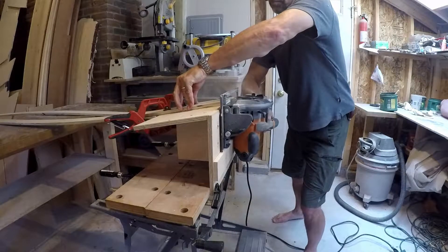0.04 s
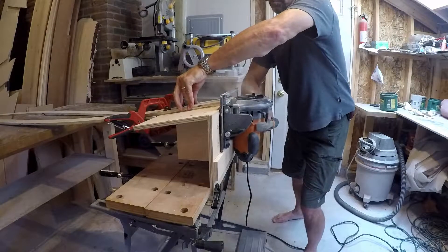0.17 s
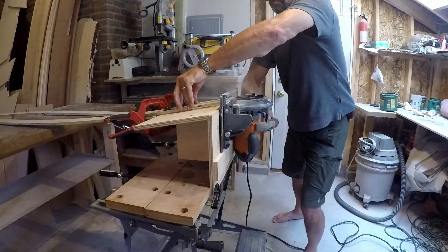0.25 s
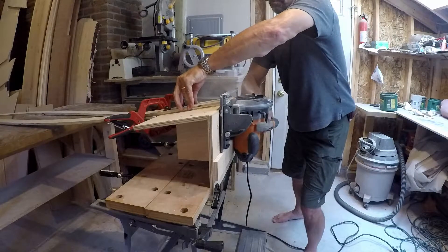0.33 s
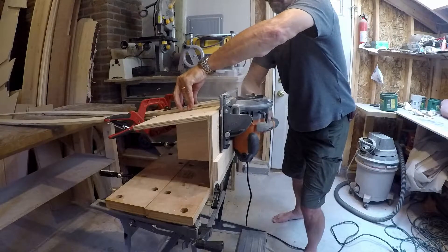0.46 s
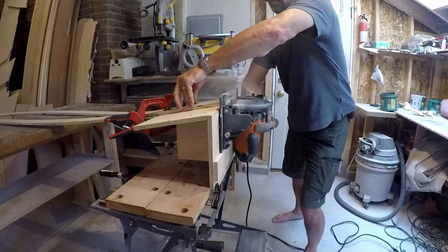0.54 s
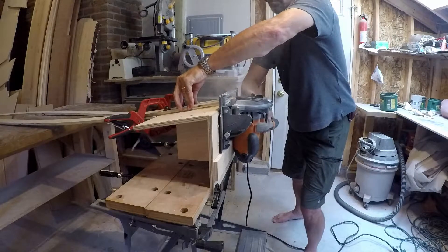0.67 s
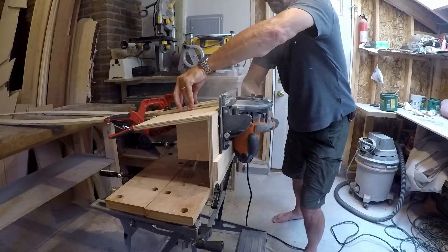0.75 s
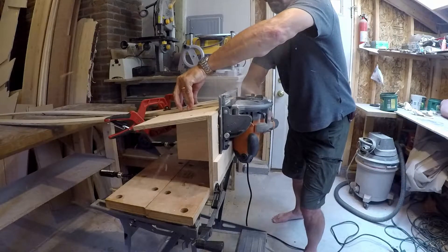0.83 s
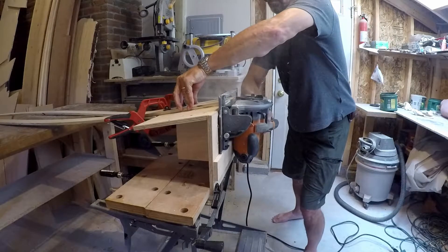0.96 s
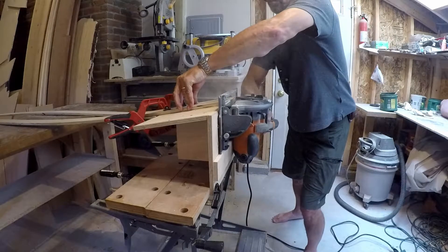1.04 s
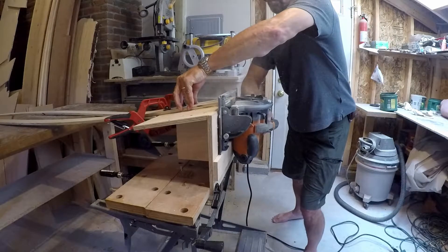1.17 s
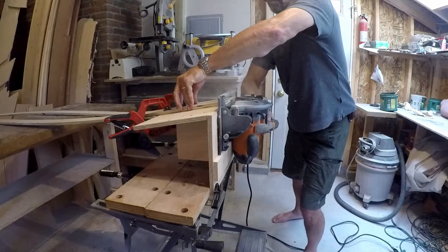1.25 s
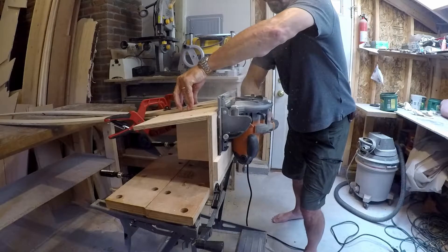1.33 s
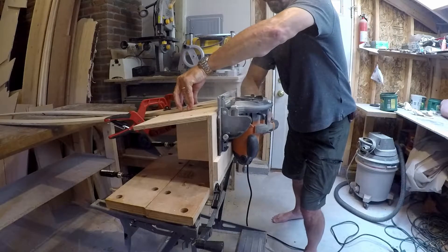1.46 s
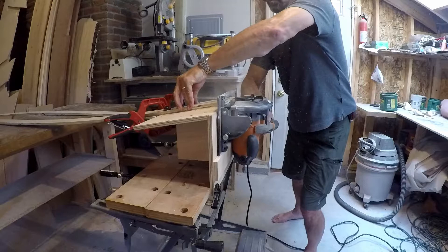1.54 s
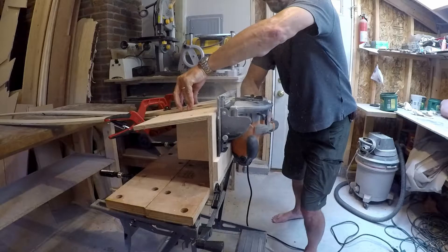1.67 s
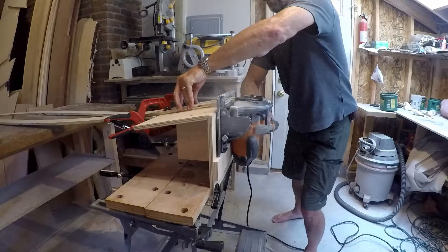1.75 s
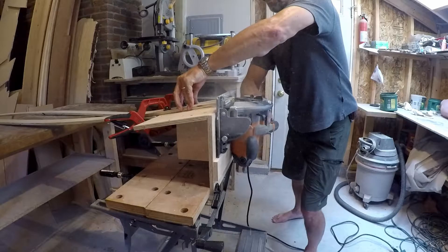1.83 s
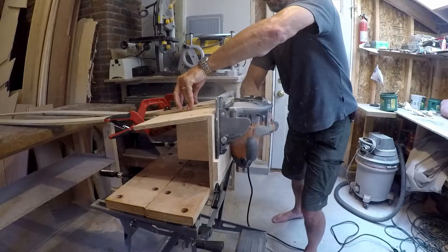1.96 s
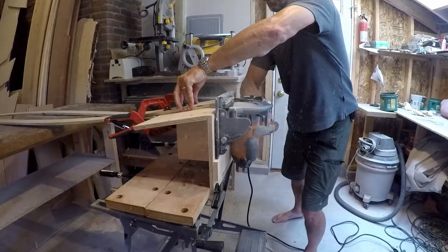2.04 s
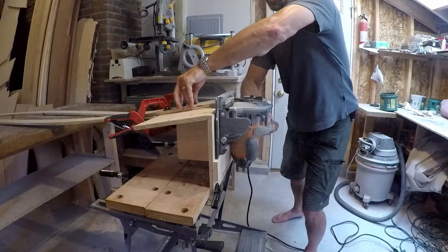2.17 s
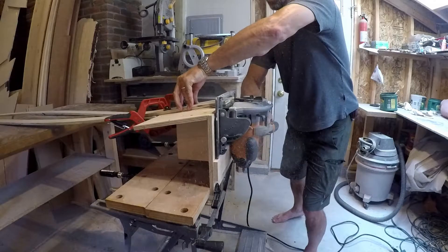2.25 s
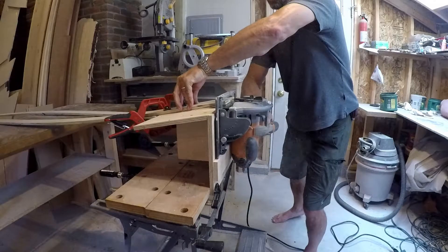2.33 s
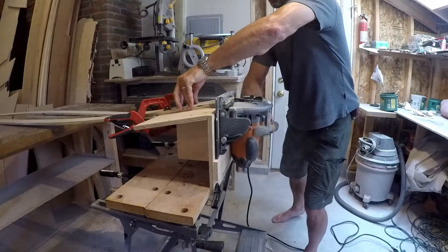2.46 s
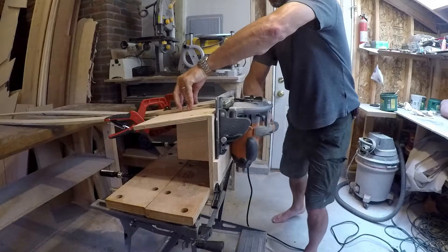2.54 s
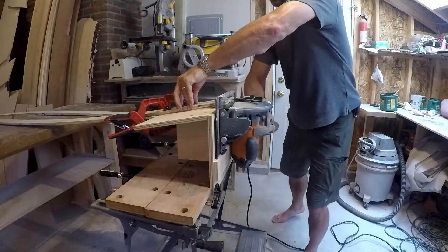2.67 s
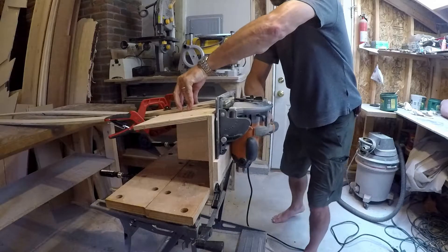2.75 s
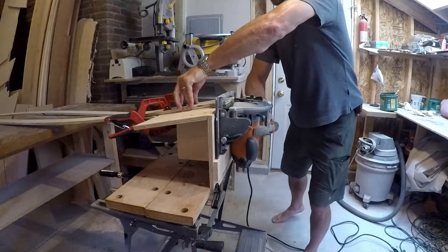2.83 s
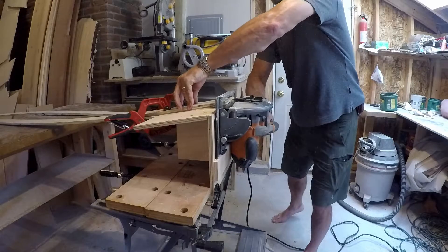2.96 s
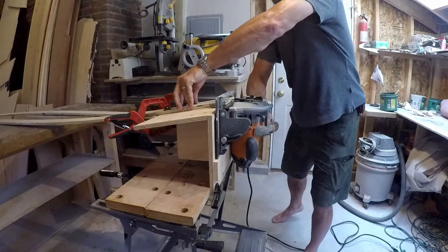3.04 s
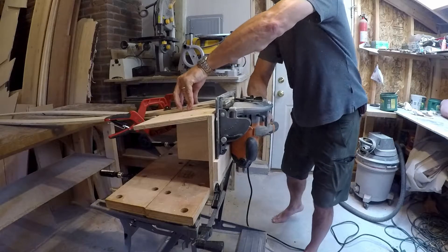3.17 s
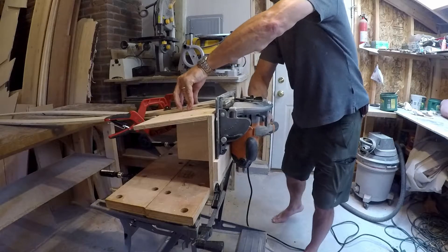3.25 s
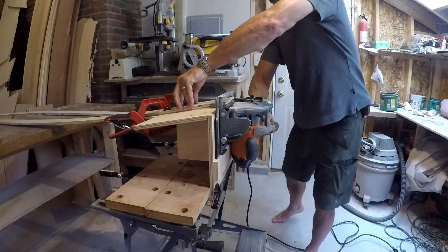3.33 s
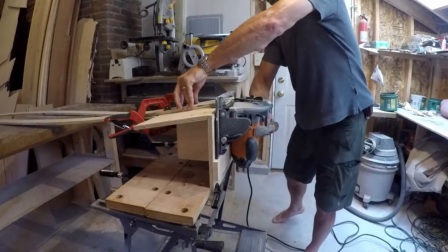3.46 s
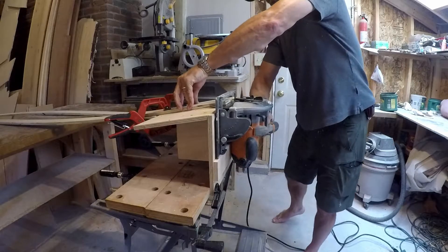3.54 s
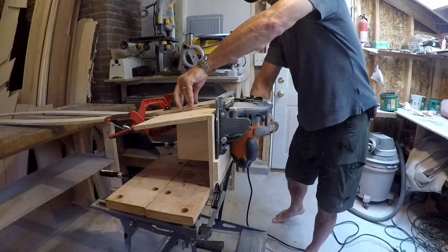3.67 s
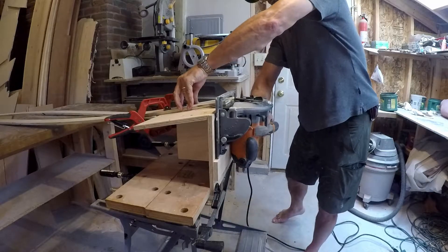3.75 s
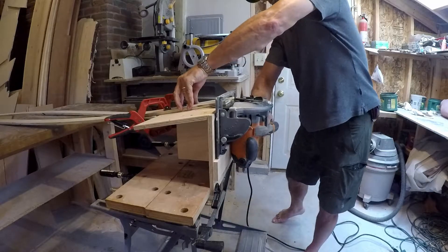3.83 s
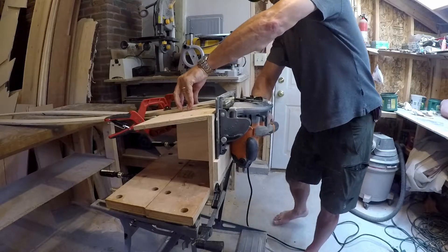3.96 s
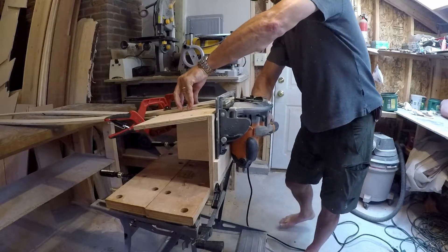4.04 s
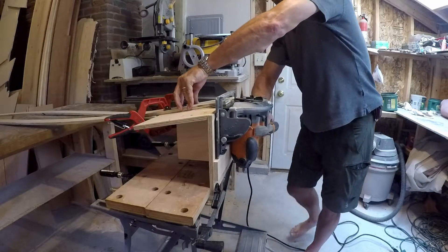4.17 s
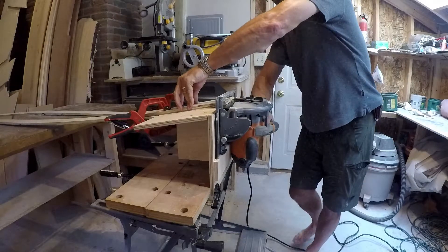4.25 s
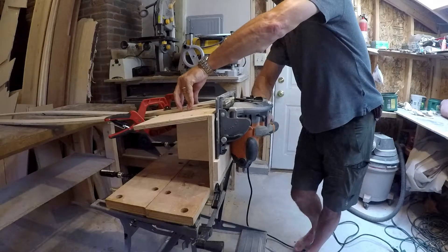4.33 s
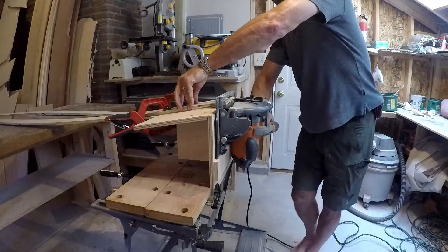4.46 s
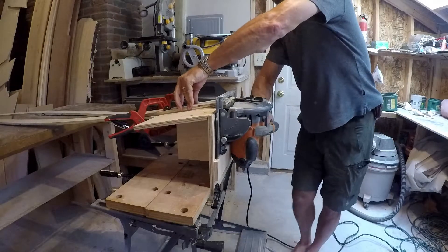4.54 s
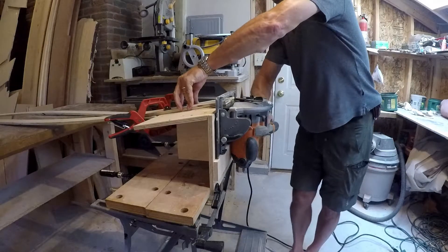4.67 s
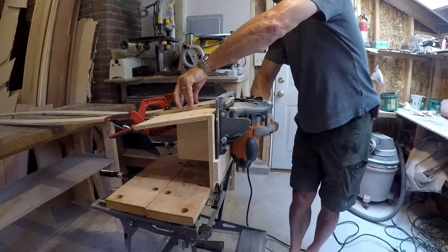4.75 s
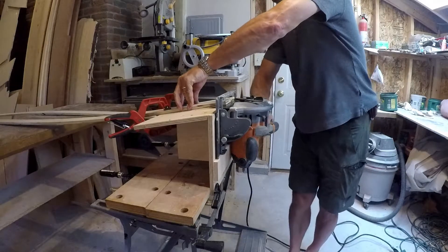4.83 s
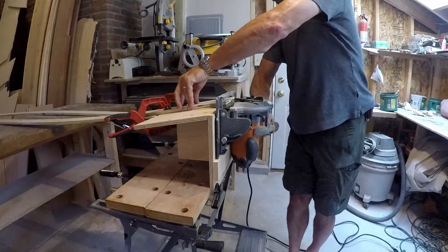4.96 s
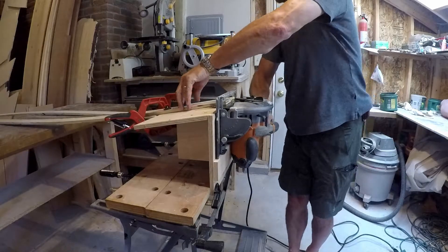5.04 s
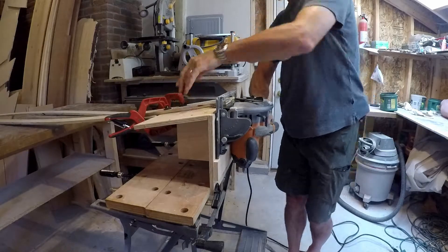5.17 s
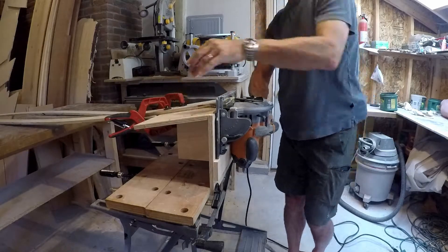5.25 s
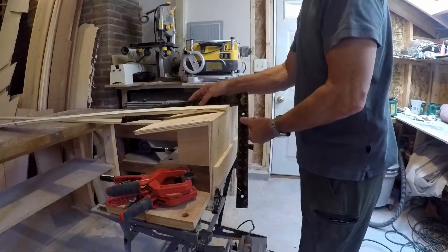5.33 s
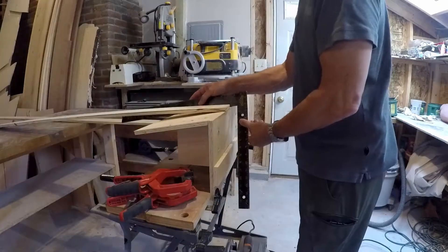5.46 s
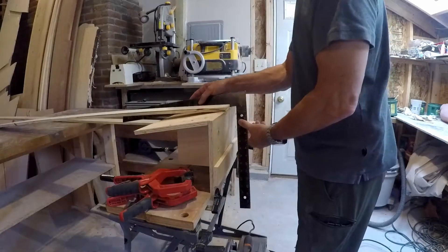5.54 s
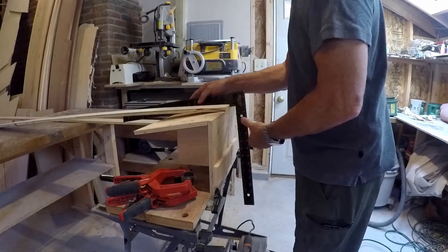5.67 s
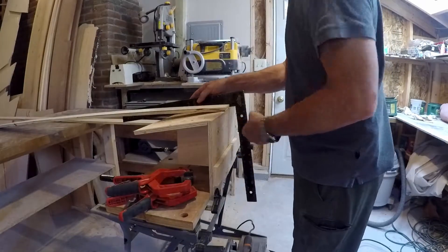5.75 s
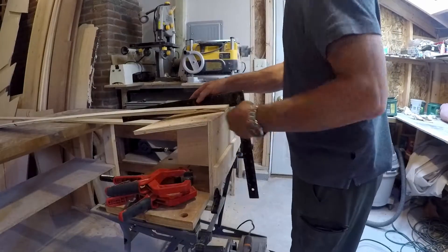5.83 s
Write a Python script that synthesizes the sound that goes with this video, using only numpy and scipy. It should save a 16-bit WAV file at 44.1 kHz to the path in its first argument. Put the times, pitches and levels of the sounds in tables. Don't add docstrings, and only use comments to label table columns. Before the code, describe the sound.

A camera microphone near the bench hears an electric saw finishing a cut: buzzing motor, high tooth whine and gritty roar. Freed, it coasts down, the whine falling while guard and base plate rattle and ring. The noise collapses just before five seconds, leaving hiss and a faint low drone. An abrupt cut brings gentle low puffs and a bright metallic knock.

```python
import sys
import numpy as np
from scipy import signal
from scipy.fft import rfft, irfft, next_fast_len
from scipy.io import wavfile
from scipy.ndimage import uniform_filter1d, map_coordinates

SR = 44100
rng = np.random.default_rng(int(sys.argv[2]) if len(sys.argv) > 2 else 0)


def unload_audio(sound):
    columns = np.transpose(np.atleast_2d(sound))
    steps = np.round(np.clip(columns, -1, 1) * 32767)
    wavfile.write(sys.argv[1], SR, steps.astype(np.int16))


def boost_factor(decibels):
    exponent = np.asarray(decibels, float) / 20
    return 10 ** exponent


N = 260190
T = np.arange(N) / SR
SCENE_CHANGE_S = 5.326


def unit(x):
    return x / np.sqrt(np.mean(np.abs(x) ** 2) + 1e-20)


def curves(rows):
    s, *cols = np.transpose(rows)
    return [np.interp(T, s, c) for c in cols]


def wobble(rate):
    coarse = T[::8]
    points = rng.standard_normal(int(N * rate / SR) + 4)
    return np.interp(T, coarse, map_coordinates(points, [coarse * rate]))


def envelope(start, hold, top_db, rise_db, fall_db):
    before = np.clip(start - T, 0, None)
    after = np.clip(T - start - hold, 0, None)
    return boost_factor(top_db - rise_db * before - fall_db * after)


def swell(s, length):
    return np.clip(1.6 - np.abs(T - s) * 2.42 / length, 0, 1) ** 2


def swells(base_db, rows):
    return boost_factor(base_db) + sum(boost_factor(db) * swell(s, length) for s, length, db in rows)


def filtered(x, response):
    m = next_fast_len(N + SR // 2)
    return irfft(rfft(x, m) * response(np.fft.rfftfreq(m, 1 / SR)), m)[:N]


def colour(points):
    f, db = np.transpose(points)
    return lambda hz: boost_factor(np.interp(np.log(hz + 1), np.log(f + 1), db))


def resonance(f, hz, width):
    return 1j * f * width / (hz * hz - f * f + 1j * f * width)


def ring_power(f, body, offset_db=0, widen=1):
    return sum(np.abs(boost_factor(db + offset_db) * resonance(f, hz, widen * w) ** 2) ** 2 for hz, w, db in body)


def rush(response, patchy_db):
    z = signal.stft(rng.standard_normal(N), nperseg=512)[2]
    field = uniform_filter1d(rng.standard_normal(z.shape), 4, 0)
    field = uniform_filter1d(field, 12, 1)
    patchy = signal.istft(z * boost_factor(patchy_db * unit(field)), nperseg=512)[1][:N]
    return unit(filtered(patchy, response))


def ringing(air, body, lift_db, comb_db):
    base = colour(air)
    top = max(db - 20 * np.log10(base(hz)) for hz, w, db in body)
    knots = np.tanh(rng.standard_normal((2, 900)))

    def response(f):
        fine = comb_db * map_coordinates(knots[0], [f / 28])
        fine = fine * (1 + .6 * (f > 8500)) / (1 + (1500 / (f + 1)) ** 2)
        coarse = 3 * map_coordinates(knots[1], [f / 170]) / (1 + (10500 / (f + 1)) ** 8)
        parts = ring_power(f, body, lift_db - top, widen=1.24)
        return boost_factor(fine + coarse) * np.sqrt(base(f) ** 2 + parts)

    return response


def narrow(hz, width):
    return unit(filtered(rng.standard_normal(N), lambda f: resonance(f, hz, width) ** 2))


def tone(phase, blur, rate):
    flicker = unit(1 + blur * (wobble(rate) + 1j * wobble(rate)))
    return np.sqrt(2) * np.real(flicker * np.exp(1j * phase))


def blade():
    # [t/s, f/Hz]
    tooth_rate = [
        (0, 1317),
        (.87, 1328),
        (1.43, 1477),
        (1.53, 1393),
        (1.65, 1238),
        (1.83, 1041),
        (2.05, 855.5),
        (2.3, 750),
        (2.7, 648),
    ]
    # [multiple, level in the wood/dB, level running free/dB]
    tooth_partials = [(1, -13, -13), (2, -3, -3), (4, 11.5, 11.5), (5, 4.5, -3), (6, 2.5, 5), (7, 8.5, 2),
                      (8, 7, 4), (9, 6, 7), (10, 8.5, 11.5), (11, 9, 10)]
    # [multiple, level/dB]
    vane_partials = [(4, -8), (6, 0), (7, -12), (8, 1), (9, -11), (10, -8), (11, -12), (12, -11), (13, -13),
                     (14, -14)]
    # [f/Hz, width/Hz, level/dB]
    case_notes = [(3110, 500, -33), (2620, 300, -37), (2090, 540, -23.5)]
    # [f/Hz, level/dB]
    mouth = [(1000, -19), (3000, -5), (5500, -14.5), (6600, 0.5), (8000, 0), (9500, -14), (11000, -15.5),
             (13500, -19.5), (15500, -20)]
    rate, = curves(tooth_rate)
    phase = 2 * np.pi * np.cumsum(rate) / SR
    runout = 1 + 0.59 * np.cos(phase / 20)
    out = np.clip((T - .88) / .15, 0, 1)
    teeth = sum(boost_factor(db + out * (free_db - db)) * tone(k * phase, blur=7.1, rate=3.2 * k * k + 15)
                for k, db, free_db in tooth_partials)
    fan = sum(boost_factor(db) * tone(k * phase, blur=3.4, rate=70 * k) for k, db in vane_partials)
    bite_gain = envelope(start=0, hold=1.45, top_db=-39, rise_db=20, fall_db=70)
    fan_gain = envelope(start=1.62, hold=.38, top_db=-27.5, rise_db=55, fall_db=80)
    housing = filtered(bite_gain * runout * teeth + fan_gain * fan, colour(mouth))
    gear_order, shaft_order = 2.109, .245
    case = sum(boost_factor(db) * np.abs(resonance(gear_order * rate, hz, w)) ** 3 for hz, w, db in case_notes)
    gear_gain = np.clip((T - .71) / .15, 0, 1) * envelope(0, hold=2.05, top_db=0, rise_db=0, fall_db=90)
    gear = gear_gain * case * tone(gear_order * phase, blur=3, rate=190)
    shaft_gain = envelope(start=1.58, hold=.95, top_db=-47.5, rise_db=40, fall_db=30)
    shaft = shaft_gain * tone(shaft_order * phase, blur=0.5, rate=25)
    return (T < tooth_rate[-1][0]) * (housing + gear + shaft)


def motor():
    # [f/Hz, level/dB]
    loaded_notes = [(1437, -47), (1572, -42), (2186, -45), (2433, -41), (2670, -45), (2794, -39),
                    (2912, -47), (3112, -45), (3219, -46), (3402, -47), (3644, -44), (4021, -49),
                    (4344, -47), (4646, -44), (5518, -49), (5652, -46), (5766, -46), (5949, -46),
                    (6342, -37), (6406, -45), (6621, -35), (6799, -44), (7031, -47), (7101, -46),
                    (7483, -45), (7903, -39), (7967, -43), (8646, -52), (9119, -50), (9308, -46)]
    # [t/s, level/dB]
    load = [
        (0, 2),
        (.25, 2),
        (.7, 1.5),
        (.95, 2.5),
        (1.15, -34),
        (1.4, -43),
        (5.9, -70),
    ]
    # [middle t/s, length/s, middle f/Hz, level/dB]
    slide_notes = [(2.76, .66, 2000, -35.5), (3.15, .5, 960, -43), (3.45, .3, 3800, -38),
                   (3.57, .3, 1420, -38)]
    sag_per_s = .54
    loaded = sum(boost_factor(db) * tone(2 * np.pi * hz * T, blur=.6, rate=35) for hz, db in loaded_notes)
    blur = unit(1 + 1.3 * (wobble(45) + 1j * wobble(45)))
    slides = 0
    for s, length, hz, db in slide_notes:
        phase = -2 * np.pi * hz / sag_per_s * np.exp(sag_per_s * (s - T))
        slides = slides + np.sqrt(2) * boost_factor(db) * swell(s, length) * np.real(blur * np.exp(1j * phase))
    return boost_factor(curves(load)[0]) * loaded + slides


def coasting_air():
    # [f/Hz, level per Hz/dB]
    air = [(65, -60), (110, -34), (163, -22), (285, -24.5), (700, -21), (1100, -8), (1620, -12.5),
           (2840, -13), (4850, -17), (7360, -7), (9300, -18.5), (10800, -25.5), (13000, -32),
           (15500, -29.5)]
    # [f/Hz, width/Hz, level/dB]
    fast_body = [(1850, 68, -8), (2060, 43, -6), (3060, 54, 0), (3300, 260, -7), (3600, 170, -5),
                 (4130, 48, -11), (4540, 64, -13), (5010, 39, -11), (5450, 77, -9), (5950, 91, -4),
                 (6470, 150, -2), (7150, 50, -3), (7340, 67, -3), (7550, 46, -3), (8260, 46, -9),
                 (8770, 120, -11), (9850, 160, -21), (10400, 46, -17)]
    # [f/Hz, width/Hz, level/dB]
    slow_body = [(1430, 53, -4), (2020, 51, -6), (2740, 31, -6), (3060, 77, -1), (3300, 260, -7),
                 (3540, 100, -2), (3850, 26, -12), (4170, 40, -10), (4390, 87, -13), (5410, 51, -8),
                 (6470, 130, 0), (7280, 260, 0), (7540, 23, -1), (8310, 36, -3), (8670, 110, -12),
                 (8840, 54, -9), (9390, 170, -12), (9840, 120, -19), (10300, 190, -16)]
    # [f/Hz, width/Hz, level/dB]
    bench = [(462, 44, -10), (518.6, 44, -10), (1118, 64, -3.5), (1518, 21, -8), (3180, 120, -7.5),
             (6040, 88, -9)]
    slow = np.clip((T - 3.016) / 0.63, 0, 1)
    early = rush(ringing(air, fast_body + bench, lift_db=14.0, comb_db=5.0), patchy_db=1.15)
    slow_parts = slow_body + bench + [(6030, 220, -2.0), (2640, 32, -8.0)]
    late = rush(ringing(air, slow_parts, lift_db=12.5, comb_db=4.5), patchy_db=2.0)
    return np.sqrt(1 - slow) * early + np.sqrt(slow) * late


def guard_ring(free, fade):
    # [t/s, length/s, level/dB]
    guard_bursts = [(0.025, 0.14, -31.5), (0.18, 0.42, -33), (0.415, 0.19, -23), (0.724, 0.63, -26),
                    (1.036, 0.22, -24.5), (1.263, 0.36, -25.5), (1.456, 0.06, -31), (1.735, 0.15, -26.5),
                    (1.851, 0.03, -24), (2.21, 0.36, -32.5), (2.45, 0.076, -29), (2.705, 0.1, -24.5),
                    (2.932, 0.093, -17.5), (3.052, 0.055, -24.5), (3.164, 0.21, -28.5), (3.506, 0.27, -29),
                    (3.818, 0.25, -24), (3.984, 0.34, -32.5), (4.185, 0.095, -24.5), (4.32, 0.11, -27.5)]
    hz = 1113 + free * (1098 - 1113) + 3.99 * wobble(11)
    return fade ** .6 * swells(-40, guard_bursts) * tone(2 * np.pi * np.cumsum(hz) / SR, blur=.7, rate=80)


def board_drum(fade):
    # [t/s, length/s, level/dB]
    board_bursts = [(.4, 0.29, -51), (1.208, 0.39, -39), (1.485, 0.2, -27.5), (3.38, 0.36, -49),
                    (4.2, 0.45, -48), (4.65, .35, -46)]
    return swells(-52.5, board_bursts) * np.sqrt(fade) * tone(2 * np.pi * 342 * T, blur=.35, rate=18)


def base_plate(fade):
    # [t/s, length/s, level/dB]
    plate_bursts = [(1.85, 0.14, -33), (2.282, 0.3, -28), (2.498, 0.26, -33), (2.85, 0.12, -32),
                    (3.04, 0.053, -24), (3.25, 0.099, -31), (3.394, .06, -27), (3.458, .08, -24.5),
                    (3.733, 0.06, -27.5), (4.447, .13, -28)]
    gain = envelope(start=1.08, hold=.42, top_db=-32, rise_db=29, fall_db=40) + swells(-80, plate_bursts)
    return fade * gain * boost_factor(1.6 * wobble(12)) * narrow(3060, 69)


def last_ringing():
    # [f/Hz, width/Hz, level/dB]
    last_body = [(345, 32, -7), (511, 36, -8), (1100, 40, 0), (1430, 22, -9), (1660, 41, -13),
                 (1980, 31, -7), (2550, 18, -12), (2680, 36, -12), (3050, 62, -6), (3520, 48, -8),
                 (3850, 56, -14), (4200, 30, -13), (4470, 26, -17), (4830, 51, -25), (5180, 15, -13),
                 (5290, 36, -12), (5920, 56, -12), (6290, 32, -7), (6470, 58, -6), (7420, 280, -10),
                 (7760, 28, -14), (8130, 35, -15), (8450, 30, -14), (9280, 47, -24), (9510, 40, -19),
                 (9720, 29, -23)]
    # [t/s, level/dB]
    last_level = [
        (3.8, -52),
        (4.2, -35.5),
        (4.45, -37),
        (4.65, -26.5),
        (4.8, -33.5),
        (4.9, -49),
        (5, -64),
        (5.1, -75),
    ]
    ring = rush(lambda f: np.sqrt(ring_power(f, last_body, widen=.9)), patchy_db=2.5)
    return boost_factor(curves(last_level)[0]) * ring


def roar():
    # [t/s, air and chips level/dB, brightness/dB]
    running = [(0, -22, -16), (.85, -23, -15), (1.15, -20.5, -14.5), (1.5, -20, -17.5), (1.9, -21.5, -12),
               (2.15, -21.5, -17), (2.6, -21, -15.5), (3, -21.5, -15.5), (3.5, -21.5, -11.5),
               (3.95, -22, -12), (4.4, -22.5, -17.5), (4.67, -27.5, -17), (4.82, -38.5, -23),
               (4.89, -49.5, -21), (5.05, -81, -20)]
    # [f/Hz, level per Hz/dB]
    cut_air = [(65, -85), (110, -30), (177, -16), (274, -17.5), (469, -10.5), (820, -16), (1100, -8.5),
               (1690, -10), (3710, -11), (5070, -14.5), (6770, -7.5), (9430, -18.5), (11400, -29.5),
               (13700, -30.5), (15500, -35)]
    # [f/Hz, width/Hz, level/dB]
    cut_body = [(1100, 31, 3.5), (1310, 19, -24), (2440, 24, -18), (3140, 310, 0), (3720, 330, -0.5),
                (5840, 240, 1), (6340, 34, -19), (6290, 11, 7.5), (7030, 33, -30.5), (7660, 260, 3),
                (7800, 77, -12), (10400, 40, -4)]
    air_db, fizz_db = curves(running)
    free = np.clip((T - 1.78) / .26, 0, 1)
    full_db = -17.5
    low_db = -1.5 + free * (-1 + 1.5) + 0.78 * np.clip(full_db - air_db, 0, 30) - 2 * swell(1.92, 0.44)
    cut = rush(ringing(cut_air, cut_body, lift_db=7.0, comb_db=5.0), patchy_db=2.0)
    air = np.sqrt(1 - free) * cut + np.sqrt(free) * coasting_air()
    fizz = filtered(air, lambda f: 1 / (1 + (9500 / (f + 1)) ** 8))
    low = filtered(air, lambda f: 1 / (1 + (f / 1500) ** 4))
    air = air - fizz - low + boost_factor(low_db) * low + boost_factor(fizz_db) * unit(fizz)
    fade = boost_factor(np.minimum(air_db - full_db, 0))
    steady = boost_factor(air_db + 0.078 * wobble(8.8)) * air
    steady = steady + guard_ring(free, fade) + board_drum(fade) + base_plate(fade)
    return (T < running[-1][0]) * steady + last_ringing()


def rattles():
    # [t/s, length/s, f/Hz, level/dB]
    loose_parts = [(.1, .4, 1316, -30), (.46, .75, 1308, -27), (.8, .28, 1332, -31.5),
                   (.55, .45, 1234, -34), (.917, .77, 1227, -30), (1.173, .15, 396.5, -34),
                   (1.37, .35, 238, -41), (.45, .9, 240, -43), (.4, .9, 305, -44), (.5, 1, 190, -46),
                   (.3, .6, 375, -45), (.3, .5, 650, -44), (1.55, .5, 650, -44), (1.1, .25, 1960, -38),
                   (1.2, .2, 1880, -37), (2.089, .11, 3430, -32), (2.25, .5, 1520, -41),
                   (2.511, .073, 1313, -33), (2.5, .1, 1440, -36), (3.35, .6, 2745, -41),
                   (3.33, .12, 2580, -38), (3.594, .041, 3570, -34), (3.85, .35, 2600, -42),
                   (4.35, .6, 390, -47), (4.7, .3, 4200, -47), (4.72, .3, 5200, -48), (4.6, .6, 1975, -45),
                   (4.84, .2, 2680, -50)]
    return sum(boost_factor(db) * swell(s, length) * tone(2 * np.pi * hz * T, blur=.25, rate=30)
               for s, length, hz, db in loose_parts)


def clamp():
    # [t/s, peak level/dB, sharpness 0-1 or more]
    blows = [
        (5.686, -29.5, 1),
        (5.6987, -64, 9),
        (5.7141, -63, 8),
        (5.7994, -66, 0.1),
    ]
    # [f/Hz, width/Hz, level/dB]
    jaw_notes = [(2060, 90, -7), (3130, 35, 7.5), (3700, 40, 0), (6660, 41, -1), (7330, 68, -7),
                 (9350, 99, -15), (11400, 150, -26), (13300, 250, -27)]
    # [f/Hz, width/Hz, level/dB]
    tail_notes = [(2100, 400, -5), (3030, 450, 0), (3580, 410, -6), (6500, 850, -6), (7400, 300, -2),
                  (8700, 500, -12), (9550, 400, -9)]
    # [t/s, length/s, f/Hz, level/dB]
    hand_scuffs = [
        (5.648, .045, 6200, -60),
        (5.812, .035, 6300, -64),
    ]
    tail, knocks = np.zeros(N), np.zeros(N)
    lags = np.array([-.0026, -.0015, 0, .0019])
    for s, db, sharp in blows:
        t = np.clip(T - s - .001, 0, None)
        tail += (t > 0) * boost_factor(db - 17.5 - 60 * t / 0.43)
        spots = np.round((s + lags) * SR).astype(int)
        knocks[spots] = sharp * boost_factor(db + 24.5) * np.array([.06, 0.27, 1, -.55])

    def jaw(f):
        return sum((-1) ** k * boost_factor(db) * resonance(f, hz, 4 * w + 330) ** 2
                   for k, (hz, w, db) in enumerate(jaw_notes))

    tail_noise = unit(filtered(rng.standard_normal(N), lambda f: np.sqrt(ring_power(f, tail_notes))))
    scuffs = sum(boost_factor(db) * swell(s, length) * narrow(hz, 1300) for s, length, hz, db in hand_scuffs)
    return tail * tail_noise + filtered(knocks, jaw) + scuffs


def shop():
    # [f/Hz, level per Hz/dB]
    hiss = [(65, -57), (110, -21), (170, -7), (209, -16), (257, -11.5), (291, -16.5), (397, -13.5),
            (423, -18), (478, -21), (820, -19.5), (2960, -35), (4800, -38.5), (7600, -34), (8300, -39),
            (15500, -51)]
    # [t/s, level/dB]
    hiss_level = [
        (0, -51),
        (4.2, -44),
        (4.6, -43.5),
        (5.3, -48.5),
        (5.35, -49.5),
        (5.9, -50.5),
    ]
    # [t/s, length/s, level/dB]
    drone_swells = [(.345, .082, -46), (.838, .37, -52), (1.435, .19, -48), (2.453, .19, -51),
                    (3.42, .11, -49), (3.61, .1, -49), (4.3, 1, -50), (4.79, .14, -44), (4.99, .16, -42.5),
                    (5.22, .19, -43.5)]
    # [t/s, peak level/dB]
    flutter = [
        (5.409, -45),
        (5.509, -44),
        (5.609, -46),
        (5.719, -49),
        (5.819, -52),
    ]
    drone_gain = swells(np.where(T < SCENE_CHANGE_S, -65, -70), drone_swells)
    drone = drone_gain * tone(2 * np.pi * 170.5 * T, blur=.15, rate=18)
    pushes = np.zeros(N)
    for s, db in flutter:
        u = np.clip((T - s) / 0.0041, 0, 50)
        pushes += boost_factor(db + 9.5) * u * (2 - u) * np.exp(-u)
    rumble = (T > SCENE_CHANGE_S) * boost_factor(-69) * narrow(60, 70)
    return boost_factor(curves(hiss_level)[0]) * rush(colour(hiss), patchy_db=1.3) + drone + pushes + rumble


def scene():
    return (blade() + motor() + roar() + rattles() + clamp() + shop())[None]


def thin_out(x):
    # [t/s, length/s, kept above level/dB]
    thin_moments = [(.355, .018, -1), (.439, .016, -3), (.547, .018, -3), (.92, .03, -1), (1.058, .015, -3),
                    (1.185, .016, -1.5), (1.397, .019, -3), (1.463, .017, -2), (1.527, .016, -2),
                    (1.912, .017, -3), (1.976, .015, -3), (2.037, .015, -3), (2.486, .015, -2),
                    (2.53, .013, -3), (2.871, .02, -3), (3.085, .015, -2), (3.512, .014, -2),
                    (3.596, .016, -2), (3.682, .018, -5), (4.567, .028, -3), (5.005, .013, -12),
                    (5.24, .013, -10), (5.326, .01, -9)]
    hz, t, z = signal.stft(x, SR, nperseg=1024, noverlap=896)
    power = np.abs(z) ** 2 + 1e-24
    slow = np.abs(uniform_filter1d(power, size=14, axis=1))
    band = uniform_filter1d(slow, size=5, axis=0)
    wide = uniform_filter1d(slow, size=45, axis=0)
    weak = ((band < .53 * wide) | (power < .3 * wide)) & (hz > 10800)[:, None]
    z = z * np.where(weak, .02, 1) * (hz < 15050)[:, None]
    s, length, db = np.transpose(thin_moments)
    bar = boost_factor(2 * np.interp(t, s, db) + 5) * wide ** .2 * np.mean(power[:250], 0) ** .8
    keep = 0.17 * (0.015 / np.interp(t, s, length)) + 1.25 / (1 + (.8 * bar / power) ** 4)
    middle = np.searchsorted(t, s)[np.argmin(np.abs(t[:, None] - s), axis=1)]

    def back(v):
        return signal.istft(v, SR, nperseg=1024, noverlap=896)[1][:N]

    whole, sparse = back(z), back(z * keep[:, middle])
    share = sum(np.clip((b / 2 + .005 - np.abs(T - a)) / .007, 0, 1) for a, b in zip(s, length))
    return whole + np.clip(share, 0, 1) * (sparse - whole)


def roll_off(x):
    return signal.sosfilt(signal.butter(12, 15760, fs=SR, output="sos"), x)


def record(dry):
    cut = filtered(dry[0], lambda f: 1 / (1 + (135 / (f + 1)) ** 9) + boost_factor(-104.0))
    leak = boost_factor(-91 + 12.0 * wobble(9)) * narrow(40, 60)
    mix = np.where(T < SCENE_CHANGE_S, cut + leak, dry[0])
    return roll_off(thin_out(mix)[None])


dry = scene()
out = record(dry)
unload_audio(out)
```